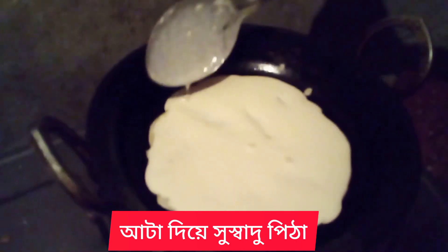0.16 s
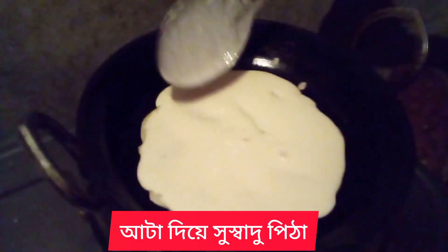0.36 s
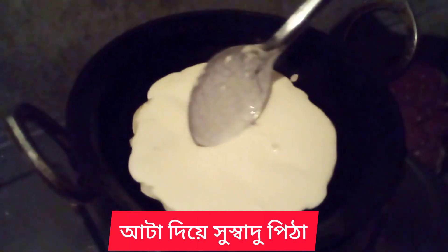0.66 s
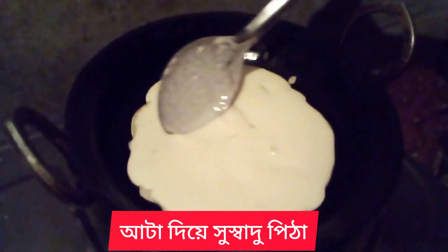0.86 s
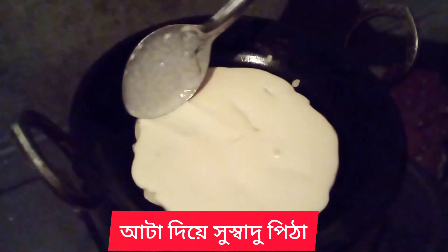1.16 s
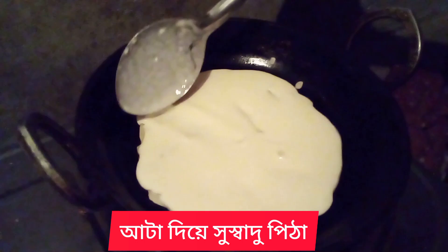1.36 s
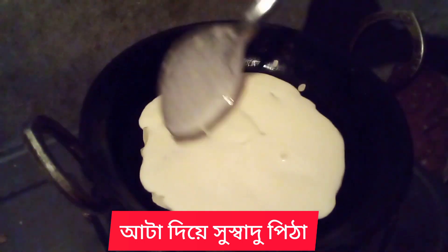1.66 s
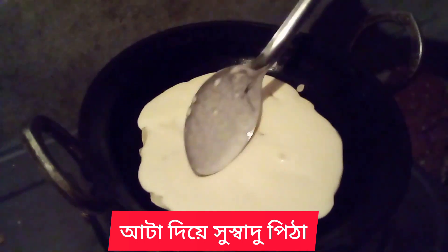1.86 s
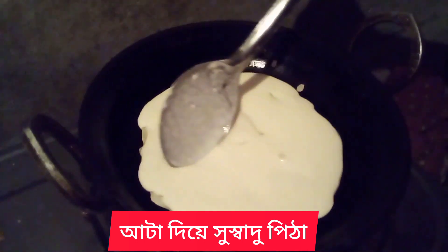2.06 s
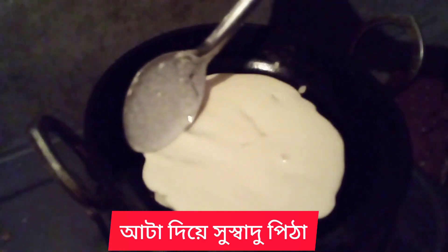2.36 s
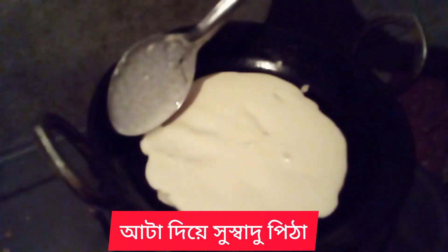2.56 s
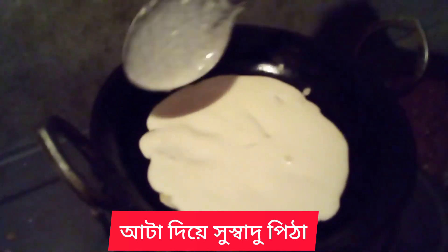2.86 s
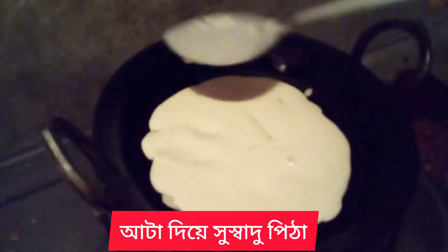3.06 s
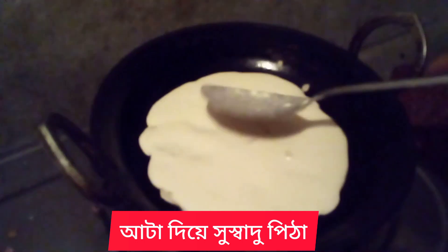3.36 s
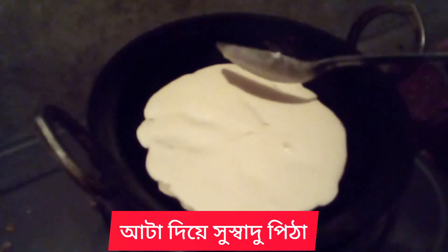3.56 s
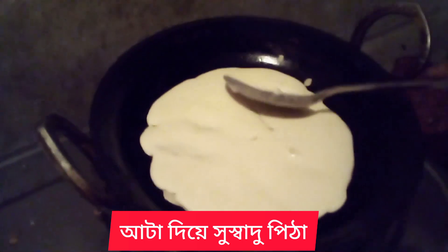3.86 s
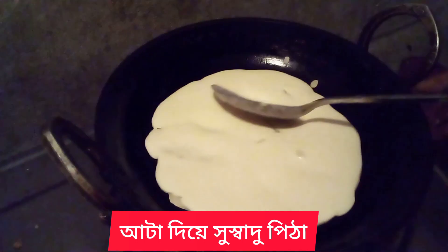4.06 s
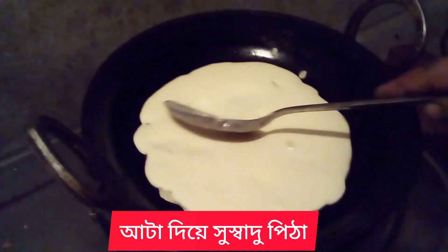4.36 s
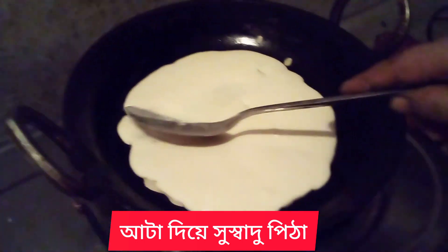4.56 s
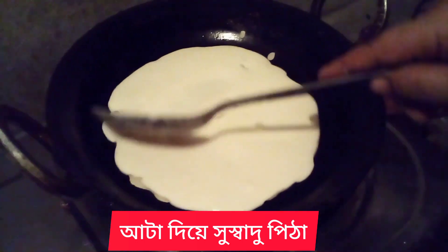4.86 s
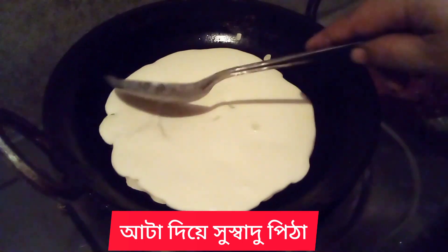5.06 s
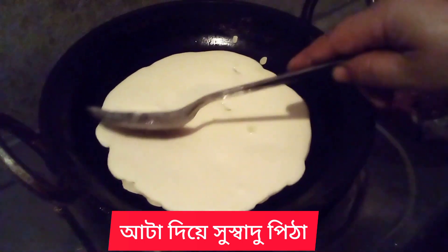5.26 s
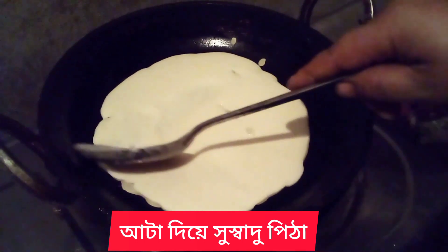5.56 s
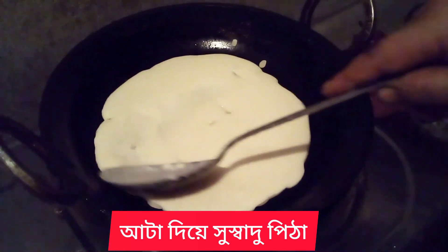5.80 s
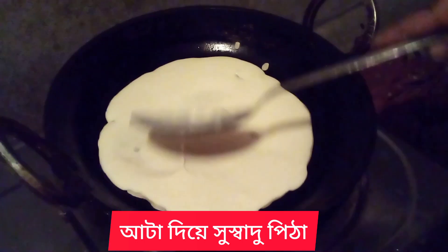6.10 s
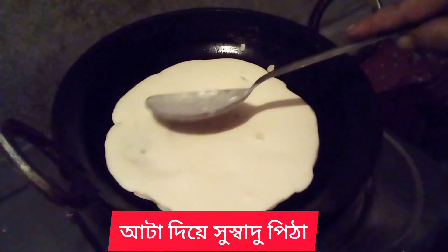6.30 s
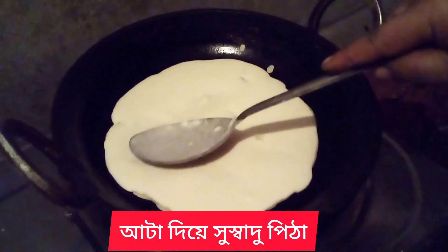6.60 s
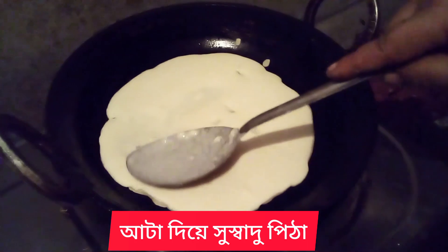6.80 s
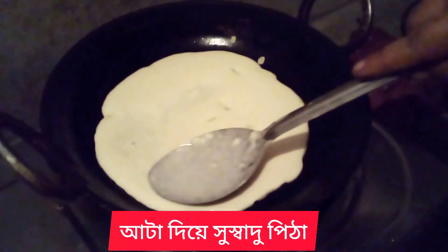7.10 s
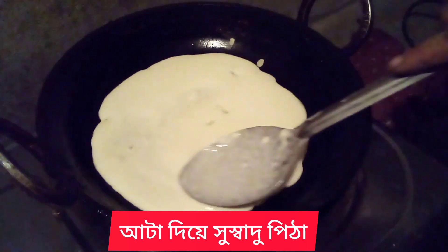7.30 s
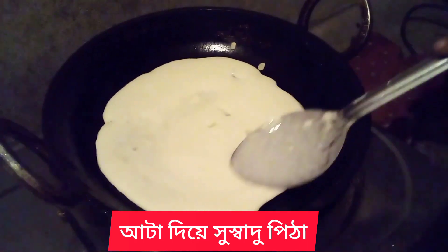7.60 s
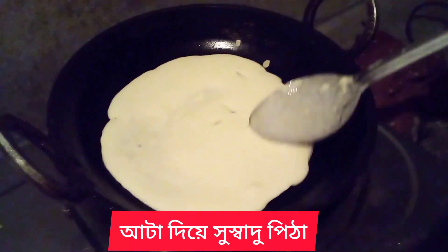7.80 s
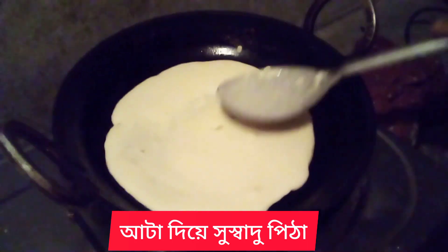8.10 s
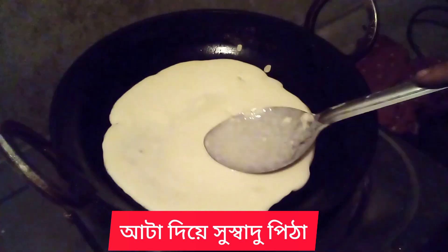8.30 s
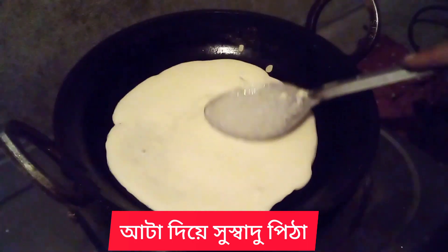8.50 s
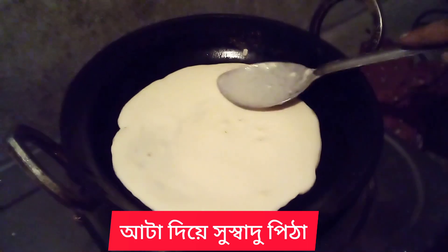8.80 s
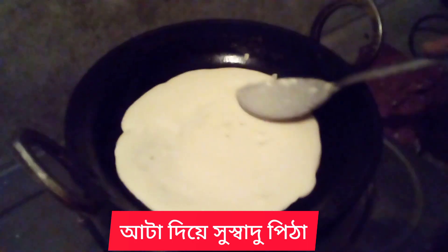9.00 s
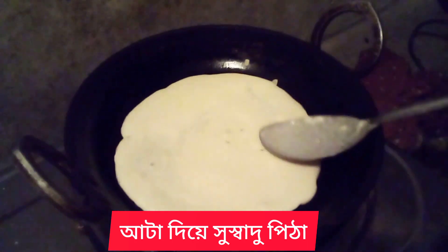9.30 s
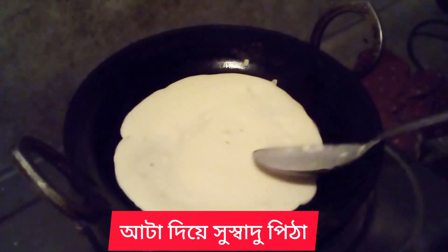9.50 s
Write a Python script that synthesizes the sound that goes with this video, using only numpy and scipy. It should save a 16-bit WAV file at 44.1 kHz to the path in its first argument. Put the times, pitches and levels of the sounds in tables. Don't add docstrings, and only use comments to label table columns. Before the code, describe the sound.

Close above a hot iron pan in a small kitchen, thin batter sizzles with dense, bright crackle and faint metallic colour. A gurgling hiss swells at 0.1-0.3 s and fades; a fat spatter ticks the spoon near 0.76 s. Further swells come around 0.9 and 1.2-1.7 s, with a small sharp spatter at 2.0 s and a loud pop near 2.46 s. Strong steam bursts peak at 2.7-2.8 s, settling into steady frying. Two dull, low footfalls elsewhere ring the floor at 3.5 and, softer, 4.0 s. Frying eases, then small pops gather around 5.4 s before a big hiss near 5.8 s. After a quieter stretch, surges come at 7.0-7.2, 7.6 and 8.25 s. It thins briefly, then sharp, fine-grained bursts flare at 8.9-9.2 s, with a faint one near 9.6 s. Low room rumble stays quietly behind, settling at the end.

```python
import sys
import numpy as np
from scipy import signal
from scipy.fft import rfft, irfft, next_fast_len
from scipy.io import wavfile
from scipy.ndimage import uniform_filter1d, map_coordinates

SR = 44100
rng = np.random.default_rng(int(sys.argv[2]) if len(sys.argv) > 2 else 0)


def to_linear_factor(level_db):
    exponent = np.asarray(level_db, float) / 20
    return 10 ** exponent


def digitize_waveform(pressure):
    field = np.atleast_2d(pressure).T
    bounded = np.clip(field, -1, 1)
    quanta = np.round(bounded * 32767).astype(np.int16)
    wavfile.write(sys.argv[1], SR, quanta)


N = 425565

USUAL_DB = -39.5
# pitch_hz, density_db (per Hz)
FAR_RIM = [(410, -62), (700, -27), (860, -19), (1500, -12.5), (3000, -10), (3500, -4), (4100, -5),
           (5000, -6.5), (6200, -2.5), (7300, -3), (8800, -6.5), (13000, -1.5), (15000, 1), (16000, -2.5)]


def unit(x):
    return x / np.sqrt(np.mean(x ** 2) + 1e-20)


def along(points, hz):
    f, v = np.transpose(points)
    return np.interp(np.log(hz + 1), np.log(f + 1), v)


def wobble(rate):
    knots = rng.standard_normal(int(N * rate / SR) + 4)
    return map_coordinates(knots, [np.arange(N) * rate / SR])


def filtered(x, gain):
    m = 16384
    cepstrum = irfft(np.log(gain(np.fft.rfftfreq(m, 1 / SR)) + 1e-5), m)
    cepstrum[1:m // 2] *= 2
    cepstrum[m // 2 + 1:] = 0
    response = irfft(np.exp(rfft(cepstrum)), m)[:m // 2]
    return signal.oaconvolve(x, response)[:len(x)]


def flow(lag_s=0, fade=1, fine=0):
    # fullest_s, rise_s, level_db, fade_db_per_s, fineness_db
    pushes = [(.128, 0.28, -31.5, 16, -3), (.283, 0.19, -36, 64, -1), (.91, .45, -42, 22, -5),
              (1.231, 0.049, -37, 20, 0), (1.44, 0.2, -32, 14.5, -6), (1.74, .14, -40, 33, -11),
              (2.252, 0.1, -39.5, 114, 0), (2.664, 0.31, -34, 146, -0.5), (2.825, 0.24, -30, 68, -1.3),
              (3.069, 0.15, -39, 22, 1), (3.97, .1, -48, 40, 3), (4.27, .2, -44, 26, 2),
              (5.397, 0.061, -40, 62, 2.5), (5.52, 0.077, -37, 45, 2), (5.773, 0.32, -31, 36.5, -0.2),
              (6.021, .05, -56, 40, 7.5), (6.988, .05, -45.5, 4, 9.5), (7.18, 0.18, -33, 39, -1),
              (7.647, 0.1, -36, 25.5, .5), (8.253, 0.061, -38.5, 41, -1.2), (8.916, .011, -29.5, 34.5, 3.5),
              (9.04, 0.043, -29.5, 45.5, 5), (9.188, 0.039, -33.5, 53, 7.5), (9.61, .08, -44, 53, 5.5)]
    # time_s, level_db, fineness_db
    frying = [(0, -55, -4), (1.2, -54, 0), (2.4, -41, -1), (3.3, -41.5, -3.5), (3.6, -41, -3.5),
              (3.9, -39.5, -2), (4.4, -42, 1), (4.6, -47, -3), (5.3, -46.5, -4.5), (6.3, -47, 1.5),
              (6.9, -48.5, -1.5), (8.55, -55.5, -10.5), (8.7, -47.5, -7), (8.9, -49.5, -4.5),
              (9.65, -49.5, 7)]
    rise_power = 0.63
    t = np.arange(0, N, 32) / SR
    fullest_s, rise_s, db, fall, fineness = np.transpose(pushes)[..., None]
    since = t - fullest_s - lag_s
    rising_db = 20 * rise_power * np.log10(np.clip(1 + since / rise_s, 1e-3, 1))
    shape_db = np.where(since < 0, rising_db, -fall * fade * since)
    pushed = (to_linear_factor(db + shape_db + fine * fineness) ** 2).sum(axis=0)
    s, *columns = np.transpose(frying)
    steady_db, steady_fine = (np.interp(t, s, column) for column in columns)
    power = pushed + to_linear_factor(steady_db + fine * steady_fine) ** 2
    return np.interp(np.arange(N) / SR, t, 10 * np.log10(power) - USUAL_DB)


def gurgle():
    # fullest_s, half_length_s, bubbles_db (over the flow), rumble_db (extra)
    gurgles = [
        (0.123, 0.095, 5, 0),
        (1.4, 0.21, 2, 1),
        (1.9, 0.085, 0, 2),
        (2.29, .05, 4, -1),
        (2.75, .2, 0, -3),
        (5.75, 0.16, -0.5, 3.5),
        (7.06, 0.092, 2.5, 3),
        (7.3, 0.19, -0.2, 3.5),
    ]
    t = np.arange(N) / SR
    return sum(np.outer(dbs, np.exp(-((t - s) / half) ** 2)) for s, half, *dbs in gurgles)


def pan(hz, lo, hi, colour):
    # pitch_hz, width_hz, level_db
    iron_modes = [(975, 110, 6), (1393, 53, 5), (1514, 21, 8), (1814, 12, 5), (2144, 4.3, 8.5),
                  (2558, 12, 8.5), (3520, 66, 2), (4340, 320, 1), (7070, 230, 4)]
    iron = 1 + sum((to_linear_factor(db) - 1) / (1 + (2 * (hz - c) / w) ** 2) for c, w, db in iron_modes)
    edges = 1 / np.sqrt((1 + (lo / (hz + 1)) ** 12) * (1 + (hz / hi) ** 12))
    return to_linear_factor(along(colour, hz)) * iron * edges


def bursts(rate, spread_db, clump_db):
    hit = rng.random(N) < rate / SR
    clumps_db = clump_db * (wobble(14) + wobble(60) + wobble(300))
    size_db = np.minimum(spread_db * rng.exponential(size=N) + clumps_db, 17)
    return unit(hit * to_linear_factor(size_db) * rng.choice([-1, 1], size=N))


def patchy(x, depth_db):
    z = signal.stft(x, nperseg=512)[2]
    field = uniform_filter1d(rng.standard_normal(z.shape), size=7, axis=0)
    field = uniform_filter1d(field, size=16, axis=1)
    return signal.istft(z * to_linear_factor(depth_db * unit(field)), nperseg=512)[1][:N]


def sizzle():
    # low_hz, high_hz
    sizes_hz = [(900, 2800), (2800, 5800), (5800, 9500), (9500, 17000)]
    # low_hz, high_hz
    whole_hz = (900, 17000)
    spot_changes_s = [1.22, 3.57, 4.55, 6.95, 8.24, 8.92]
    # pitch_hz, density_db (per Hz)
    back_rim = [(530, -45), (900, -19), (979, -18.5), (1510, -13), (2800, -9), (3560, 0.5), (5040, -2),
                (6880, 2.5), (11600, -3.5), (13900, 3.5), (15700, 0)]
    near_rim = [(410, -57), (700, -17), (1100, -16), (1800, -12.5), (2800, -10.5), (3600, -3), (5200, -6.5),
                (7300, -7.5), (10000, -9.5), (14000, -9.5), (16000, -8)]
    side_rim = [(410, -65), (700, -23), (1300, -15), (2350, -11), (2800, -9), (4200, -6), (5000, -12.5),
                (6400, -14), (7500, -7), (9500, -8), (10300, -12), (13800, -10), (16000, -17)]
    # large_db, middle_db, small_db, tiny_db
    shares = [
        (-8.5, -3, -0.1, 5.5),
        (-11, -3.5, -1.15, 1.9),
        (-11.5, -4.5, -0.2, -2),
        (-10.5, -4.5, -0.7, 0.6),
        (-11, -2, 1.2, 4.5),
        (-12.5, -4, -3, -2),
        (-13, -1.5, 2.5, -4),
    ]
    lags_s = (0.046, 0.036, 0.026, .026)
    fades = (0.98, 1.035, 0.97, 1.02)
    swings = (.77, 1.06, 1.3, 1.52)
    fine_weights = (-0.49, -0.55, -0.078, 0.77)
    crack_db, fizz_db = (-12.0, -5.5, -3.5, -16), (-8.0, -6, -1.5, -1.0)

    cracks = bursts(rate=1500, spread_db=3.0, clump_db=3.0)
    cuts = [0, *(round(s * SR) for s in spot_changes_s), N]
    colours = (back_rim, FAR_RIM, FAR_RIM, FAR_RIM, near_rim, side_rim, side_rim)
    levels_db = [USUAL_DB + swing * flow(lag, fade, fine)
                 for lag, fade, swing, fine in zip(lags_s, fades, swings, fine_weights)]
    levels_db[0] = levels_db[0] + gurgle()[0]
    out = np.zeros(N)
    for level_db, share_db, (lo, hi), crack, fizz in zip(
            levels_db, np.transpose(shares), sizes_hz, crack_db, fizz_db):
        steam = rng.standard_normal(N) * to_linear_factor(0.12 * wobble(16))
        own_fizz = bursts(rate=2500, spread_db=4.0, clump_db=3.17)
        swarm = steam + to_linear_factor(crack) * cracks + to_linear_factor(fizz) * own_fizz
        parts = []
        for a, b, db, colour in zip(cuts, cuts[1:], share_db, colours):
            heard = filtered(swarm[a:b], lambda hz: pan(hz, lo, hi, colour))
            parts.append(to_linear_factor(db) * unit(heard))
        out += to_linear_factor(level_db + 0.46 * wobble(11)) * np.concatenate(parts)
    simmer = filtered(rng.standard_normal(N) + cracks, lambda hz: pan(hz, *whole_hz, FAR_RIM) ** 2)
    return patchy(out, depth_db=0.64) + to_linear_factor(-51) * unit(simmer)


def kitchen():
    # pitch_hz, density_db (per Hz)
    air_colour = [(15, -42), (30, -20), (64, -1), (125, -2.5), (200, -11), (377, -7), (900, -30.5),
                  (1200, -47)]
    rumble_colour = [(60, -22), (130, -5.5), (300, -10.5), (600, -4), (780, -9), (1200, -47.5)]
    # start_s, length_s, pitch_hz, level_db
    far_hums = [
        (5.148, 0.25, 371, -59),
        (6.535, 0.17, 378, -61),
        (9.2, .1, 385, -63),
    ]
    t = np.arange(N) / SR
    ending_db = np.interp(t, [9.1, 9.6], [0, -10.5])
    air_noise, drone_noise, rumble_noise, deep_noise = rng.standard_normal((4, N))

    air = to_linear_factor(-59.5 + ending_db) * unit(filtered(air_noise, lambda hz: to_linear_factor(along(air_colour, hz))))
    walk_db = 15.5 * np.exp(-((t - 3.6) / 0.8) ** 2)
    deep_db = -71 + walk_db + 3 * wobble(2.82) + ending_db
    deep = to_linear_factor(deep_db) * unit(filtered(deep_noise, lambda hz: 1 / (1 + ((hz - 51) / 7) ** 2)))
    drone = unit(filtered(drone_noise, lambda hz: 1 / (1 + ((hz - 86) / 9) ** 2)))
    drone = to_linear_factor(-68.5 + 4.9 * wobble(2.8)) * drone
    follow_db = 0.57 * flow(lag_s=0.04, fade=0.64, fine=-0.8) + gurgle()[1]
    rumble_db = -62.5 + follow_db + 0.92 * wobble(2.94) + ending_db
    rumble = to_linear_factor(rumble_db) * unit(filtered(rumble_noise, lambda hz: to_linear_factor(along(rumble_colour, hz))))
    hums = np.zeros(N)
    for s, length, hz, db in far_hums:
        swell = np.sin(np.pi * np.clip((t - s) / length, 0, 1))
        hums += to_linear_factor(db) * swell * np.sin(2 * np.pi * hz * t + 0.72 * wobble(25))
    return air + deep + drone + rumble + hums


def pops():
    # time_s, body_peak_db, edge_peak_db
    loud_pops = [(0.7583, -21, -15), (0.7805, -24, -18), (8.423, -22, -23), (1.0061, -22, -9),
                 (2.0151, -20, -17), (2.2263, -23, -13), (2.3285, -21, -18), (2.4404, -21, -17),
                 (2.4608, -9, -8), (2.6728, -21, -9), (3.0953, -20, -14), (3.1568, -19, -24),
                 (3.5382, -20, -15), (3.9844, -31, -17), (4.2485, -23, -19), (4.6443, -29, -20),
                 (5.0936, -28, -25), (5.2034, -32, -24), (5.3878, -26, -16), (5.3991, -27, -16),
                 (5.4229, -23, -14), (5.4486, -22, -17), (6.0298, -20, -13), (6.1099, -25, -19),
                 (6.2337, -33, -21), (6.4375, -32, -23), (6.4581, -29, -19), (6.8811, -27, -24),
                 (8.4118, -30, -16), (8.7956, -25, -29)]
    # low_hz, high_hz
    pop_bands = [(3100, 9000), (9000, 15600)]
    strays = 260
    t = np.arange(SR // 40) / SR
    stray_s = (np.arange(strays) + rng.random(strays)) / strays * (N / SR - t[-1])
    follow_db = 0.9 * flow(lag_s=0.019)[(stray_s * SR).astype(int)]
    scatter_db = 3.5 * np.minimum(rng.standard_normal((strays, 2)), 1)
    stray_db = follow_db[:, None] + (-29, -25) + scatter_db
    s, *peaks_db = np.transpose([*loud_pops, *np.c_[stray_s, stray_db]])

    decay = to_linear_factor(-60 * t / 0.0023) + to_linear_factor(-22 - 60 * t / 0.032)
    shapes = rng.standard_normal((len(s), len(t))) * decay
    where = np.abs(np.round((s - 0.0002) * SR)).astype(int)[:, None] + np.arange(len(t))
    out = np.zeros(N)
    for peak_db, (lo, hi) in zip(peaks_db, pop_bands):
        response = filtered(signal.unit_impulse(len(t)), lambda hz: pan(hz, lo, hi, FAR_RIM))
        rung = signal.fftconvolve(shapes, response[None], axes=1)[:, :len(t)]
        rung = rung * (to_linear_factor(peak_db + 1.5) / np.abs(rung).max(axis=1))[:, None]
        out += np.bincount(where.ravel(), rung.ravel(), N)[:N]
    return out


def knock(s, hz, rise, t60):
    t = np.maximum(np.arange(N) / SR - s, 0)
    swell = (1 - np.exp(-t / rise)) * to_linear_factor(-60 * np.minimum(t / t60, 4))
    return swell, swell * np.sin(2 * np.pi * hz * t)


def spoon():
    # time_s, level_db, rise_s
    spatters = [
        (.757, -14, .001),
        (2.0148, -21.5, .0001),
    ]
    bowl_modes = [5970, 14900]
    out = np.zeros(N)
    for s, db, rise in spatters:
        for hz in bowl_modes:
            out += to_linear_factor(db) * knock(s, hz, rise, t60=0.0094)[1]
    return out


def thuds():
    # time_s, floor_pitch_hz, ring_db, ring_t60_s, rattle_db
    steps = [
        (3.521, 88.3, -39, 1.64, -44.5),
        (3.97, 80, -47.5, 1.7, -43.5),
    ]
    noise = rng.standard_normal(N)
    rattle = unit(filtered(noise, lambda hz: 1 / (1 + (110 / (hz + 1)) ** 4) / (1 + (hz / 380) ** 2)))
    out = np.zeros(N)
    for s, hz, db, t60, rattle_db in steps:
        out += to_linear_factor(db + 2.8 * wobble(20)) * knock(s, hz, rise=0.033, t60=t60)[1]
        out += to_linear_factor(rattle_db) * knock(s, hz, rise=0.033, t60=0.94)[0] * rattle
    return out


def scene():
    mono = sizzle() + kitchen() + pops() + spoon() + thuds()
    return np.array([mono, mono])


def top_cut(x):
    return signal.sosfilt(signal.butter(12, 17020, fs=SR, output="sos"), x)


def record(dry):
    m = next_fast_len(N)
    hz = np.fft.rfftfreq(m, 1 / SR)
    kept = irfft(rfft(dry, m) / (1 + (hz / 15770) ** 500), m)[:, :N]
    return top_cut(kept)


dry = scene()
out = record(dry)
digitize_waveform(out)
```